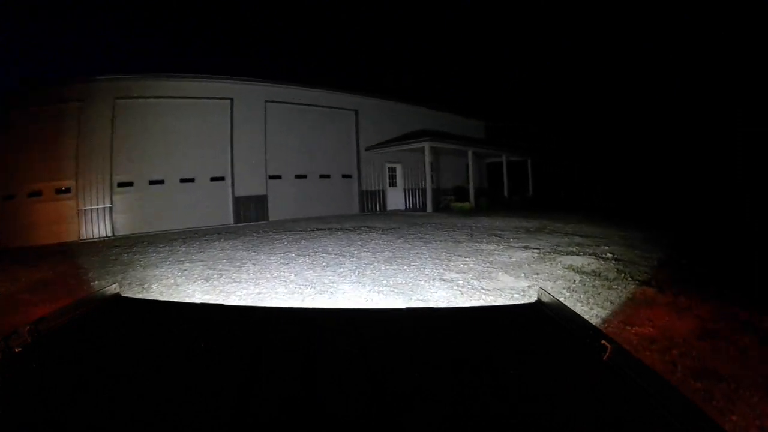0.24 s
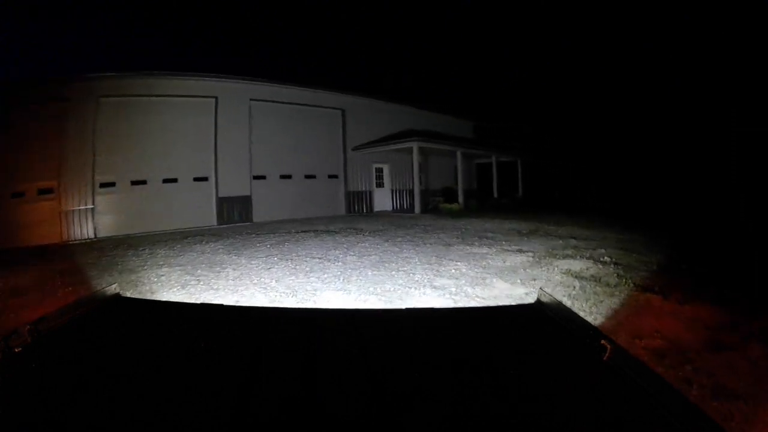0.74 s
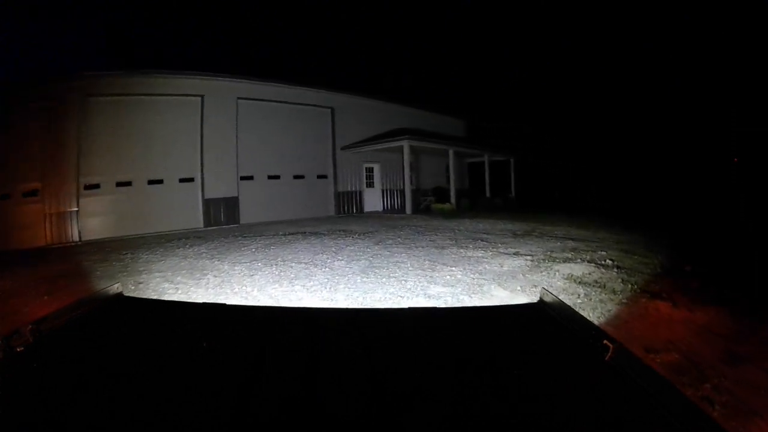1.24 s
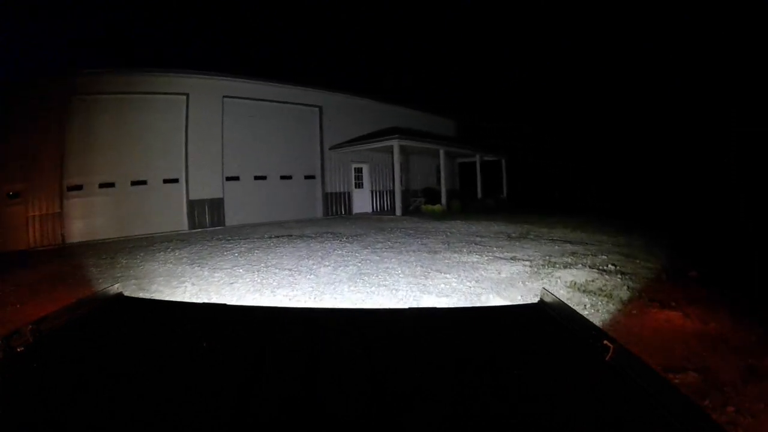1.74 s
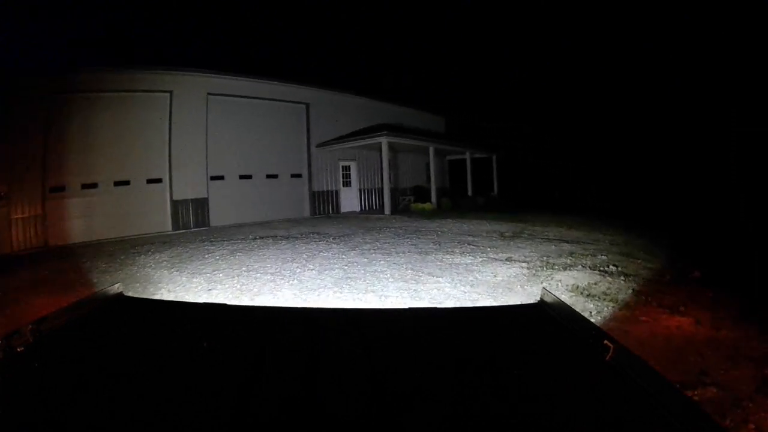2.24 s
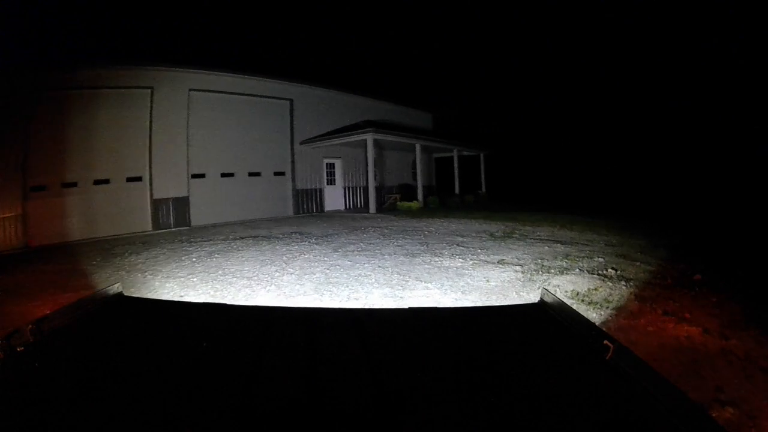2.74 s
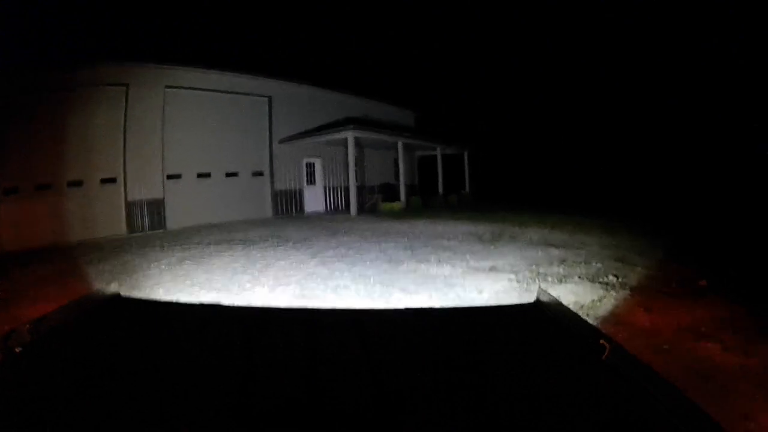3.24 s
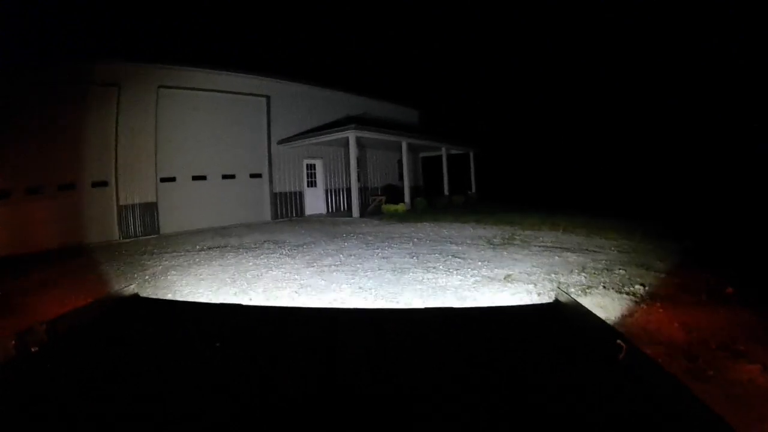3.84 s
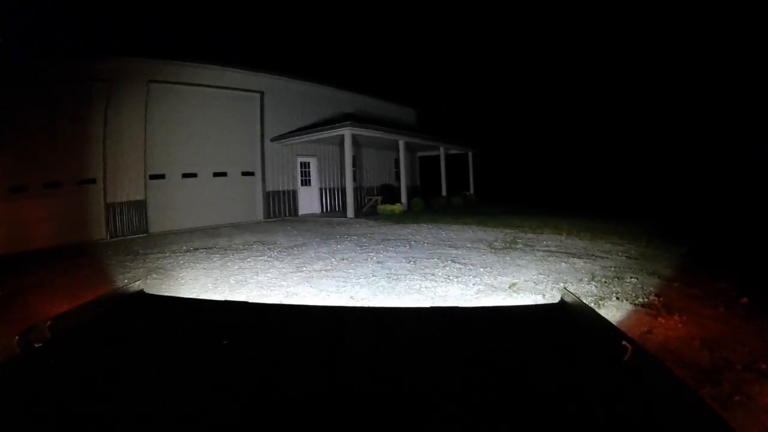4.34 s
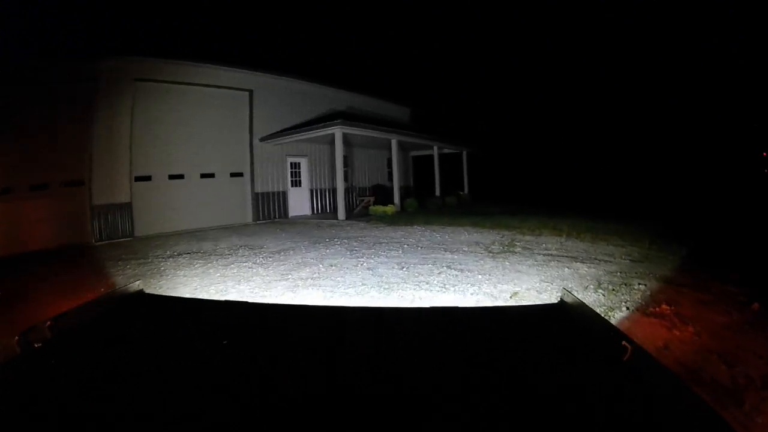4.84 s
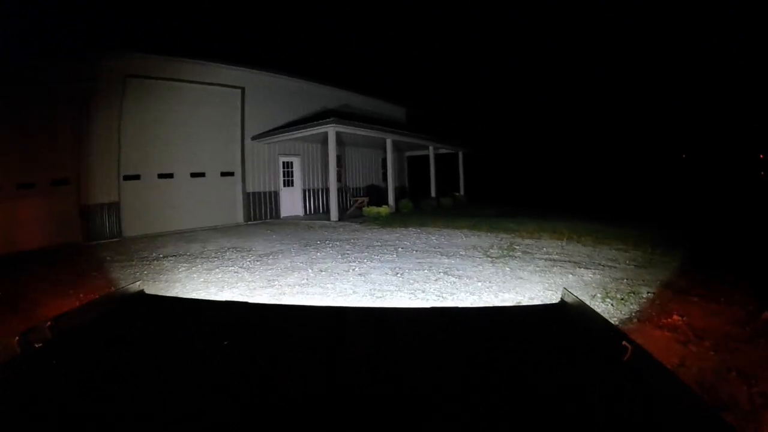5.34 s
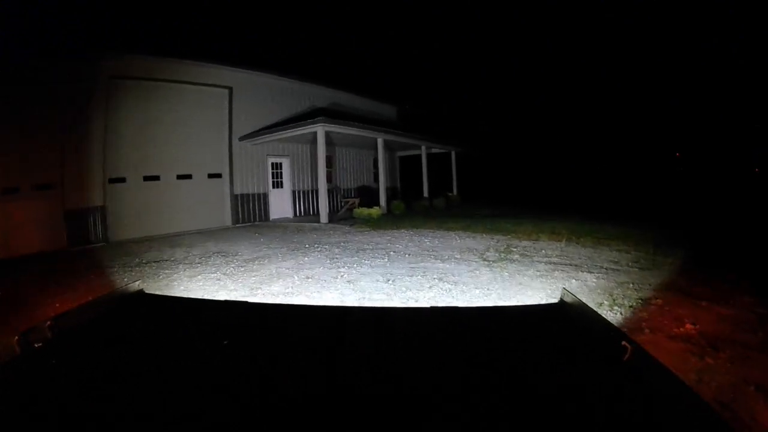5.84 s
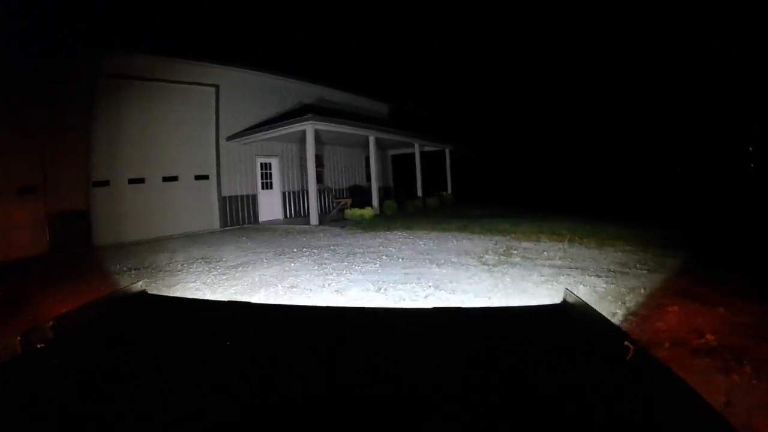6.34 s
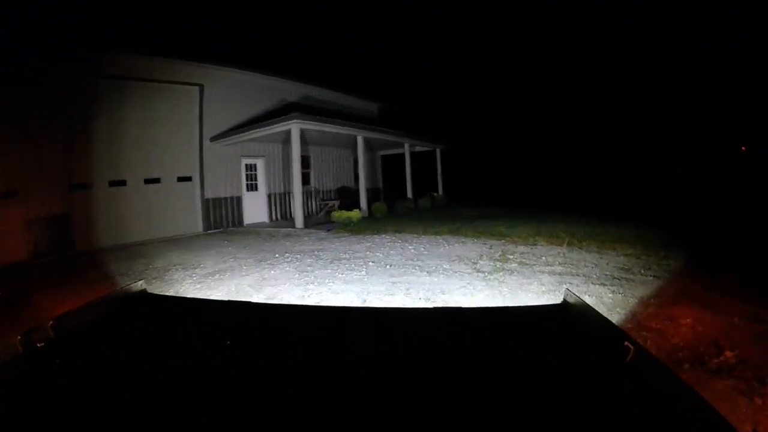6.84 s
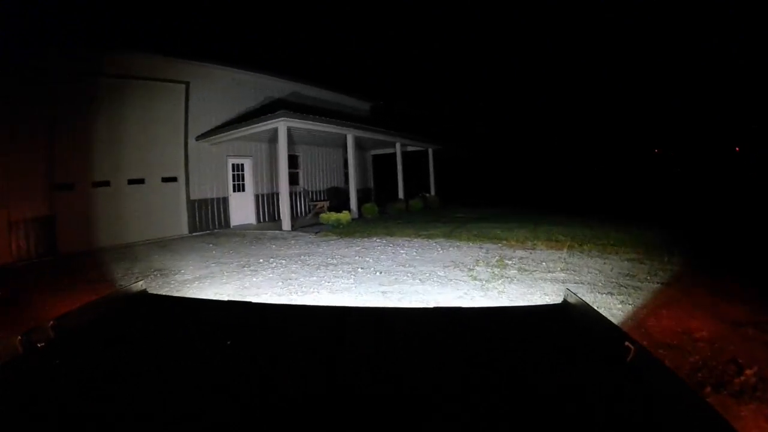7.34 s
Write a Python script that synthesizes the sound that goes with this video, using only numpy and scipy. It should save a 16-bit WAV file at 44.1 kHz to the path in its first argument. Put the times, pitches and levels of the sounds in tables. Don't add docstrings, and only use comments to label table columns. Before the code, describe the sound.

Close hollow rattling and low frame rumble over a gravel yard, swelling to a harsh overloaded battering mid-way, then easing to scattered knocks.

```python
import sys
import numpy as np
from scipy import signal
from scipy.fft import rfft, irfft
from scipy.io import wavfile
from scipy.ndimage import uniform_filter1d

SR = 44100
rng = np.random.default_rng(int(sys.argv[2]) if len(sys.argv) > 2 else 0)


def pcm_store(signal):
    levels = np.round(np.clip(np.atleast_2d(signal), -1, 1) * 32767)
    wavfile.write(sys.argv[1], SR, levels.astype(np.int16).T)


def invert_db(x):
    u = np.asarray(x, float) / 20
    return 10 ** u


N = 335160

# (frequency [Hz], density [dB per Hz])
HISS_SPECTRUM = [(1760, -0.5), (3000, -1.5), (3240, -10), (3460, -6.5), (13100, -11.5), (15900, -7),
                 (16500, -32)]
# (frequency [Hz], density [dB per Hz])
RUMBLE_SPECTRUM = [(15, -19), (28, -2.5), (46, -0.5), (58, -4.5), (73, -2.5), (100, -7.5), (115, -13),
                   (150, -49)]
# (frequency [Hz], density [dB per Hz])
GRAVEL_SPECTRUM = [(200, -16.5), (300, 8), (500, 10.5), (1000, 0), (2000, -4), (2800, -22.5), (4000, -48),
                   (6000, -35)]
# (frequency [Hz], density [dB per Hz])
CRUNCH_SPECTRUM = [(1500, -18), (2100, -1), (2560, 5), (2900, -1), (3400, 4), (4000, -6), (4900, -17),
                   (8000, -48)]
# (time [s], load on the frame [dB], shaking of the mount [dB])
ROLLING = [(0.0, -31.5, -40), (0.74, -28.5, -39.5), (0.89, -29, -34), (1.2, -33, -43), (2.01, -26, -38.5),
           (2.43, -30.5, -45), (2.9, -21.5, -35.5), (3.13, -14, -16.5), (4.04, -24, -21.5),
           (4.42, -33, -46), (4.85, -35.5, -45.5), (5.35, -29.5, -48), (5.59, -26, -40.5),
           (5.99, -31.5, -44.5), (6.5, -22, -34.5), (6.79, -22.5, -31), (6.96, -30.5, -40),
           (7.6, -35.5, -49)]
# (time [s], peak level [dB])
RUT_HITS = [(0.04, -26), (0.483, -35), (0.85, -24), (1.483, -27.5), (1.768, -17.5), (2.941, -15.5),
            (3.133, -20), (3.556, -4.5), (3.947, -12), (5.193, -21.5), (5.416, -20), (6.132, -16.5),
            (6.584, -16.5), (6.739, -40), (7.565, -12), (3.7, -25), (4.955, -22), (6.27, -17),
            (6.37, -16.5), (3.3, -3)]
# (time [s], peak level [dB], frequency [Hz])
FRAME_BUMPS = [(0.088, -25, 51), (0.253, -34, 55), (0.521, -20, 33.6), (0.764, -19, 52), (0.863, -25, 41.8),
               (0.961, -23, 53), (1.103, -29, 38.2), (1.165, -21, 73), (1.556, -25, 75), (1.672, -26, 61),
               (1.918, -24, 70), (1.99, -18.5, 72), (2.08, -13, 50.4), (2.31, -29, 50.5),
               (2.756, -18, 73.4), (2.88, -21, 72), (2.973, -11.5, 60.6), (3.149, -12, 76.5),
               (3.321, -13, 59.4), (3.501, -16, 49.5), (3.666, -9.5, 46.6), (3.808, -11.5, 40),
               (4.062, -20, 78), (4.198, -33, 78), (4.402, -23, 42.7), (4.649, -19.5, 38.3),
               (4.773, -25, 41.7), (4.997, -22, 63.5), (5.32, -18, 80), (5.448, -19, 49.6),
               (5.604, -18, 47.5), (5.723, -23, 49.7), (5.848, -18.5, 77.4), (6.37, -14, 49),
               (6.44, -32, 45), (6.596, -24, 49.7), (6.768, -13, 44.7), (7.007, -25, 69),
               (7.166, -19, 40.7)]
# (time [s], peak level [dB])
FLUNG_STONES = [(0.1157, -35), (0.5523, -26.5), (1.2026, -34), (2.8828, -32), (4.625, -36.5), (5.2, -36),
                (5.319, -28.5), (5.47, -35), (5.991, -28.5), (6.2234, -26), (6.649, -31), (6.831, -36)]
# (time [s], peak level [dB])
CLAMP_TICKS = [(0.717, -40), (1.489, -43), (2.924, -17), (2.9652, -23), (2.993, -36), (3.085, -31),
               (3.124, -33), (3.142, -13), (3.217, -26), (3.281, -21), (3.345, -23.5), (3.4016, -24),
               (3.441, -30), (3.4694, -5), (3.657, -31), (3.702, -20.5), (3.738, -33), (3.955, -31.5)]
# (time [s], peak level [dB])
CLAMP_SLAPS = [(0.8564, -31), (1.8931, -39), (2.1106, -46), (2.9284, -10), (3.0914, -17), (3.153, -10),
               (3.2425, -25), (3.2565, -12), (3.2772, -6), (3.293, -15), (3.3034, -17), (3.304, -7),
               (3.3742, -26), (3.425, -12), (3.4436, -7), (3.475, -16), (3.5678, -34), (3.6446, -27),
               (3.651, -24), (3.6684, -20), (3.8172, -29), (3.8506, -29), (3.932, -29), (4.015, -32),
               (4.0534, -28), (4.0622, -26), (4.118, -37), (4.132, -33), (6.2809, -34), (6.3624, -46)]
# (time [s], length [s], frequency [Hz], level [dB])
METAL_SQUEAK = (3.745, .047, 12150, -60)
# (time [s],
# peak level [dB], frequency [Hz], t60 [s])
SINGLE_MODE_RINGS = [(1.768, -23, 500, 0.038), (2.061, -15.5, 2060, .04), (3.67, -13, 1800, 0.053),
                     (3.738, -2, 2100, 0.015), (4.158, -17, 2060, 0.033), (5.515, -19, 2000, 0.049),
                     (6.318, -25, 696, 0.051), (6.432, -18.5, 2050, 0.043), (6.457, -14, 1280, 0.022),
                     (6.575, -12, 460, 0.028), (6.823, -20, 1970, 0.036), (6.81, -14, 800, 0.053),
                     (0.185, -25, 740, .07), (5.42, -29, 2800, 0.049), (7.424, -22, 598, 0.059),
                     (0.718, -16.5, 233, 0.085), (2.839, -27, 120, 0.11), (3.218, -17, 140, .12),
                     (3.729, -15, 220, .1), (3.87, -15, 224, .1), (5.067, -26, 115, .12), (5.51, -30, 131, .12),
                     (6.133, -18.5, 137, 0.22), (6.575, -17, 125, 0.13), (6.909, -28, 150, .12),
                     (1.276, -32, 3420, .03), (1.4, -33, 2300, .03), (2.72, -24, 3200, 0.047),
                     (7.145, -21, 2550, 0.043), (7.9, -28, 3400, .03), (5.7, -21, 560, 0.1),
                     (7.57, -24.5, 130, .15), (3.7, -13, 160, 0.11), (0.92, -24, 190, .1),
                     (6.35, -27, 130, .12), (6.64, -29, 2900, .02), (6.2, -23, 3300, 0.023),
                     (1.5, -23, 200, .1)]
# (frequency [Hz], t60 [s], level [dB])
LOW_MODES = [(279, 0.04, 3.5), (399, 0.075, -4.5), (534.6, 0.052, 6.5), (580.2, 0.054, 8.5)]
# (frequency [Hz], t60 [s], level [dB])
MAIN_MODES = [(856, 0.083, -3.5), (948.3, 0.033, 9.5), (1016.2, 0.038, 8), (1115.6, 0.017, 6),
              (1350, 0.048, -4.5)]
# (frequency [Hz], t60 [s], level [dB])
UPPER_MODES = [(1664, 0.015, 0.88), (1850, 0.013, 1), (1974, 0.014, -0.45)]
# (frequency [Hz], t60 [s], level [dB])
HIGH_MODES = [(2120, 0.017, 1), (2453, 0.031, -2.5), (2565, 0.025, -3), (3110, 0.017, -6.5),
              (3250, 0.019, -1.5), (3420, 0.019, -2.5), (3590, 0.013, -8.5), (4006, 0.022, -9),
              (4600, 0.02, -17)]
# (time [s], peak level [dB], high modes relative
# [dB], loss per rebound [dB])
HOUSING_JOLTS = [(0.066, -26.5, -25.5, 18), (0.228, -25, -26, -2), (0.295, -29, -24.5, 19.5),
                 (0.424, -17.5, -27, 25), (0.489, -9, -23, 9), (0.716, -1.5, -16.5, 5.5),
                 (0.765, -8.5, -18.5, 14), (0.799, -5.5, -23.5, -3), (0.849, -5.5, -33, 21),
                 (0.855, -3.5, -24.5, 3), (0.902, -10, -32, -3), (0.952, -15.5, -32, 3), (1.013, -19, -24, 4),
                 (1.061, -13.5, -26, 19), (1.144, -17.5, -24.5, 5), (1.178, -19.5, -25, 23),
                 (1.273, -16.5, -25, 21), (1.442, -10.5, -28.5, 3), (1.488, -6.5, -21, 8),
                 (1.577, -18, -30, 4), (1.626, -17.5, -23, 1), (1.664, -17, -19, 12), (1.788, -15, -29, 13),
                 (1.896, -13.5, -21, 6), (1.952, -14.5, -26, 28), (2.007, -15.5, -34, 20),
                 (2.061, -10.5, -18, 1), (2.111, -8.5, -21, 4.5), (2.149, -15.5, -45, 10),
                 (2.211, -14.5, -23.5, 3.5),
                 (2.314, -16, -33, 3), (2.508, -9.5, -24, 33), (2.609, -17.5, -24, 3), (2.658, -17, -43, 7),
               (2.692, -21.5, -22, 19), (2.734, -12.5, -25.5, 22), (2.807, -19, -39, 22),
               (2.871, -11, -24.5, 23), (2.909, -4.5, -36, 7), (2.923, 5, -14, 24),
               (2.963, -5.5, -14.5, 11), (2.993, -2.5, -17, 5), (3.03, -8, -50, 21), (3.044, -9, -25, 61),
               (3.085, 5.5, -17.5, 10.5), (3.141, 4, -14.5, 38), (3.166, -3.5, -36, 48),
               (3.215, -0.5, -13, 27), (3.242, -6.5, -28, 27), (3.258, 5.5, -28, 10), (3.278, 5, -18, 32),
               (3.299, 4.5, -18, 20), (3.326, -2, -17, 15), (3.344, 0, -18, -7), (3.375, -4.5, -32, -39),
               (3.399, 2, -17.5, 3), (3.424, 5, -20, 25), (3.443, 6.5, -26.5, 2), (3.465, 6, -11.5, 39),
               (3.515, -9.5, -11, 5),
                 (3.565, -3.5, -19.5, 3), (3.613, -9, -21, 20), (3.65, -0.5, -15, 19), (3.668, -3, -21, 23),
                 (3.701, -6.5, -14, 19), (3.736, -6.5, -7.5, 28), (3.634, -6.5, -14.5, 10),
                 (3.815, -6.5, -21.5, 21), (3.85, -8, -10, 3), (3.881, -6, -18, 25), (3.594, -17, -9, 20),
                 (3.933, -1.5, -24, 11), (3.956, -5.5, -14.5, 28), (3.99, -11, -17, 8),
                 (4.015, -3.5, -18.5, 18), (4.035, -4, -20.5, 10), (4.059, 1.5, -19, 3),
                 (4.112, -11, -11, 29), (4.131, -2, -22, 3), (4.158, -17, -20, -8), (4.201, -5.5, -23.5, 5),
                 (4.235, -16.5, -23, 21), (4.268, -14, -19.5, 33), (4.305, -22.5, -46, 5),
                 (4.418, -19, -24.5, -3), (4.465, -17, -32, 20), (4.686, -29.5, -36, 20),
                 (5.004, -21.5, -22.5, -3), (5.054, -22.5, -31, 19), (5.132, -17.5, -21.5, 36),
                 (5.31, -28, -21, -4), (5.419, -7.5, -27.5, 11), (5.497, -15, -26, -4),
                (5.528, -11, -26, -7), (5.576, -14.5, -22.5, 5), (5.611, -16.5, -23.5, -3),
                (5.704, -24, -25, 9), (5.773, -17, -21.5, -8), (5.898, -23.5, -25, 10),
                (5.96, -16.5, -26, 14), (6.01, -17, -24, 17), (6.148, -20, -22, -3), (6.187, -16, -19.5, 0),
                (6.28, -8.5, -16.5, -17), (6.302, -8, -33, 17), (6.346, -7, -26, -4),
                (6.361, -6.5, -15.5, 4), (6.395, -8.5, -23.5, 27), (6.431, -18.5, -18, 24),
                (6.505, -13.5, -21, 20), (6.543, -11, -27.5, 19), (6.57, -12.5, -26, 20),
                (6.623, -24, -9, 15), (6.65, -17, -33, 19), (6.806, -12.5, -18, 7), (6.896, -18, -27.5, 5),
                (6.987, -20.5, -38, 2.5), (7.116, -19.5, -26, -3), (7.142, -9, -23.5, 9),
                (7.421, -32.5, -31, 31)]
# (time [s], peak level [dB])
LIGHT_TAPS = [(0.614, -35), (0.823, -14), (0.934, -18), (0.977, -15.5), (1.473, -16.5), (1.511, -14.5),
              (1.536, -17), (1.555, -15), (1.594, -17.5), (1.646, -20), (1.695, -24), (1.858, -19),
              (2.028, -17.5), (2.332, -22), (2.357, -21.5), (2.488, -18), (2.72, -22), (2.945, -8),
              (5.514, -18.5), (5.544, -15.5), (5.652, -25), (5.726, -22), (5.739, -23.5), (5.799, -15),
              (6.102, -22), (6.456, -24), (6.583, -12.5), (6.725, -20.5), (6.767, -15.5), (7.32, -26)]
# (time [s], peak level [dB])
NUDGES = [(0.005, -17.5), (0.023, -37), (0.04, -31), (0.104, -49), (0.131, -25), (0.159, -32),
          (0.185, -18), (0.209, -28), (0.254, -28), (0.312, -32), (0.327, -30), (0.348, -46),
          (0.361, -42), (0.385, -37), (0.55, -22), (0.583, -37), (0.6, -35), (0.647, -48),
          (0.681, -52), (0.739, -1), (0.916, -23), (1.113, -23), (1.227, -27), (1.245, -22),
          (1.311, -24), (1.365, -36), (1.393, -44), (1.417, -27), (1.607, -23), (1.719, -25),
          (1.745, -18), (1.768, -16), (1.816, -17), (1.839, -14), (1.924, -15), (2.069, -15),
          (2.12, -7), (2.196, -12), (2.28, -36), (2.407, -23), (2.469, -22), (2.595, -14.5),
          (2.623, -17), (2.771, -23), (2.844, -21), (2.977, -8), (3.126, 2.5), (3.179, -32),
          (3.527, -10), (3.749, -3), (3.785, -25), (4.318, -18), (4.372, -49), (4.405, -21),
          (4.436, -15),
          (4.521, -22.5), (4.564, -33), (4.605, -23), (4.633, -31), (4.651, -34), (4.735, -21.5),
               (4.766, -31), (4.792, -52), (4.808, -43), (4.833, -44), (4.897, -30), (4.931, -41),
               (4.956, -18), (5.025, -20), (5.204, -37), (5.217, -43), (5.244, -47), (5.293, -32),
               (5.318, -20.5), (5.338, -24), (5.361, -32), (5.39, -25), (5.469, -34), (5.669, -19),
               (5.829, -17), (5.878, -33), (5.942, -23), (5.995, -22), (6.033, -25), (6.081, -25),
               (6.113, -16), (6.13, -18), (6.161, -19), (6.225, -25), (6.317, -13), (6.637, -11),
               (6.699, -11), (6.753, -17), (6.822, -11), (6.869, -41), (7.026, -38), (7.039, -37),
               (7.088, -45), (7.103, -31), (7.186, -18.5), (7.243, -29), (7.271, -34), (7.295, -37),
               (7.347, -38), (7.367, -40), (7.395, -46), (7.502, -42), (7.516, -33), (7.565, -30),
               (7.583, -22)]

KNOCK_LEN = 4096


def colour(x, spectrum):
    hz, db = np.transpose(spectrum)
    f = np.maximum(np.arange(N // 2 + 1) * SR / N, 1)
    gain_db = np.interp(np.log(f), np.log(hz), db, left=-90, right=-90)
    y = irfft(rfft(x) * invert_db(gain_db), N)
    return y / np.std(y)


def walk(rate):
    hold = int(SR / rate)
    levels = np.repeat(rng.standard_normal(N // hold + 1), hold)
    return 3.03 * uniform_filter1d(uniform_filter1d(levels, hold), hold)[:N]


def peak_one(y):
    return y / np.abs(y).max(axis=1, keepdims=True)


def place(s, sound):
    out = np.zeros(N + SR)
    for start, row in zip((s[:, 0] * SR).astype(int), sound):
        out[start:start + len(row)] += row
    return out[:N]


def band(x, lo_hz, hi_hz):
    return signal.sosfilt(signal.butter(2, [lo_hz, hi_hz], "band", fs=SR, output="sos"), x)


def lowpass(x, order, hz):
    return signal.sosfilt(signal.butter(order, hz, fs=SR, output="sos"), x)


def chatter(count, rise_s, fade_s, spiky):
    t = np.arange(KNOCK_LEN // 2) / SR
    chance = rng.standard_normal((count, len(t) + 1))
    contacts = chance[:, 1:] * np.abs(chance[:, 1:]) ** spiky
    fade = np.exp(-t / (fade_s * invert_db(2 * chance[:, :1])))
    return contacts * (1 - np.exp(-t / rise_s)) * fade


def preamp_noise():
    whine_hz, width_hz = 12820, 300
    whine = [(whine_hz - width_hz, -25), (whine_hz, 0), (whine_hz + width_hz, -25)]
    hiss = invert_db(-60.5) * colour(rng.standard_normal(N), HISS_SPECTRUM)
    return hiss + invert_db(-79) * colour(rng.standard_normal(N), whine)


def frame(load_db, shake_db):
    rumble = colour(rng.standard_normal(N), RUMBLE_SPECTRUM) * invert_db(load_db - 1.5 + walk(15.0))
    drone_spectrum = [(100, -0.5), (130, 2.0), (155, -4.0), (200, -1.5), (330, -8.5), (420, -12)]
    drone = colour(rng.standard_normal(N), drone_spectrum)
    drone_db = 0.64 * load_db + 0.35 * shake_db + 1.44
    s, db = np.transpose(RUT_HITS)[:, :, None]
    t = np.arange(SR // 2) / SR
    rise_s, fade_s = 0.0023, 0.12
    ruts = place(s, invert_db(db - 12.5) * (1 - np.exp(-t / rise_s)) * np.exp(-t / fade_s))
    return rumble + drone * np.hypot(invert_db(drone_db - 8.5), ruts) * invert_db(1.01 * walk(25))


def bumps():
    s, db, hz = np.transpose(FRAME_BUMPS)[:, :, None]
    t = np.arange(-SR // 12, SR // 12) / SR
    swell = np.exp(-(t / 0.02) ** 2 / 2)
    return place(s + t[0], invert_db(db - 3) * swell * np.sin(2 * np.pi * hz * t))


def gravel():
    grains = (rng.random(N) < 1600 / SR) * rng.standard_normal(N)
    return colour(grains * invert_db(1.45 * walk(22)), GRAVEL_SPECTRUM)


def flung_stones():
    s, db = np.transpose(FLUNG_STONES)[:, :, None]
    puffs = chatter(count=len(s), rise_s=0.0027, fade_s=0.016, spiky=0.2)
    return place(s, invert_db(db - 5.0) * peak_one(band(puffs, 1100, 3170)))


def squeak():
    start_s, length_s, hz, db = METAL_SQUEAK
    t = np.arange(N) / SR - start_s
    envelope = np.clip(np.minimum(t, length_s - t) / 0.004, 0, 1)
    return invert_db(db) * envelope * np.sin(2 * np.pi * hz * t)


def ticks():
    s, db = np.transpose(CLAMP_TICKS)[:, :, None]
    clicks = chatter(count=len(s), rise_s=0.00024, fade_s=0.001, spiky=0.45)
    return place(s, invert_db(db + 8.0) * peak_one(band(clicks, 4200, 18000)))


def slaps():
    s, db = np.transpose(CLAMP_SLAPS)[:, :, None]
    cracks = chatter(count=len(s), rise_s=0.00037, fade_s=0.0032, spiky=0.44)
    return place(s, invert_db(db - 8.0) * peak_one(band(cracks, 2900, 10600)))


def crunch(knocks):
    pole = np.exp(-1 / SR / 0.0014)
    force = signal.lfilter([1 - pole], [1, -pole], np.abs(knocks))
    crack_db = 2.5 * rng.exponential(size=N) + 0.63 * walk(37)
    cracks = (rng.random(N) < 900 / SR) * invert_db(crack_db)
    tail = rng.standard_normal(400) * np.exp(-np.arange(400) / SR / 0.00062)
    grit = colour(signal.fftconvolve(cracks, tail)[:N], CRUNCH_SPECTRUM)
    return invert_db(-17.5) * force ** 1.465 * grit


def rings():
    s, db, hz, t60 = np.transpose(SINGLE_MODE_RINGS)[:, :, None]
    t = np.arange(KNOCK_LEN) / SR
    envelope = (1 - np.exp(-t / 0.00059)) * np.exp(-np.log(1000) * t / t60)
    return place(s, invert_db(db) * envelope * np.sin(2 * np.pi * hz * t))


def ring(modes, count, scatter_db, detune):
    t, out = np.arange(KNOCK_LEN // 2) / SR, 0
    for hz, t60, db in modes:
        chance = rng.standard_normal((count, 2))
        size = invert_db(db + scatter_db * chance[:, :1])
        tone = np.sin(2 * np.pi * hz * (1 + detune * chance[:, 1:]) * t)
        out = out + size * np.exp(-np.log(1000) * t / t60) * tone
    return out


def jiggle():
    unrest = invert_db(3.5 * walk(55))
    contacts = (rng.random(N) < 1200 / SR) * rng.standard_normal(N) * unrest
    body = 0
    for modes, db in ((LOW_MODES, -4), (MAIN_MODES, 0), (UPPER_MODES, -12), (HIGH_MODES, -14)):
        body = body + invert_db(db) * ring(modes, count=1, scatter_db=1.5, detune=0)[0]
    y = signal.fftconvolve(contacts, body)[:N]
    return y / np.std(y)


def struck(blow, modes, detune, swell_s):
    decay = ring(modes, count=len(blow), scatter_db=2.5, detune=detune)
    decay = decay * (1 - np.exp(-np.arange(KNOCK_LEN // 2) / SR / swell_s))
    return peak_one(irfft(rfft(blow, KNOCK_LEN) * rfft(decay, KNOCK_LEN), KNOCK_LEN))


def blows():
    taps = [(tap_s, db, -26.5, 14) for tap_s, db in LIGHT_TAPS]
    nudge_s, nudge_db = np.array(NUDGES).T
    nudge_s = nudge_s + 0.00091 * rng.random(len(nudge_s))
    chance = rng.standard_normal((len(nudge_s), 2))
    nudges = np.transpose([nudge_s, nudge_db - 6.5, -29 + 3 * chance[:, 1], 16 + 2 * chance[:, 0]])
    return np.vstack([HOUSING_JOLTS, taps, nudges])


def housing():
    s, peak_db, high_db, loss_db = blows().T[:, :, None]
    low_db = -6.5 + 3.5 * rng.standard_normal(s.shape)
    blow = chatter(count=len(s), rise_s=0.00068, fade_s=0.0016, spiky=0.25)
    scrape = blow + 0.76 * chatter(count=len(s), rise_s=0.00053, fade_s=0.0052, spiky=0.32)
    push = lowpass(blow, 2, 1760)
    panels = struck(push, MAIN_MODES, detune=0.018, swell_s=0.0023)
    panels = panels + invert_db(low_db + 0.5) * struck(push, LOW_MODES, detune=0.024, swell_s=0.0042)
    upper = struck(scrape, UPPER_MODES, detune=0.029, swell_s=0.00074)
    high = struck(scrape, HIGH_MODES, detune=0.013, swell_s=0.0011)
    upper_gain = invert_db(1.02 * high_db + 0.13 * peak_db + 13.0)
    high_gain = invert_db(high_db + 7.0)

    def spot(k):
        bright = upper_gain * np.roll(upper, k, axis=0) + high_gain * np.roll(high, k, axis=0)
        return np.roll(panels, k, axis=0) + bright

    out = place(s, invert_db(peak_db - 0.5) * spot(0))
    for bounce in (1, 2):
        s = s + 0.02 * (1 + 0.14 * rng.standard_normal(s.shape))
        rebound_db = peak_db - 8.5 - bounce * np.maximum(loss_db, 0)
        out += place(s, invert_db(rebound_db) * spot(bounce))
    return signal.sosfilt(signal.butter(2, 206, "high", fs=SR, output="sos"), out)


def scene():
    s, load, shake = np.transpose(ROLLING)
    t = np.arange(N) / SR
    load_db, shake_db = np.interp(t, s, load), np.interp(t, s, shake)
    below = frame(load_db, shake_db) + bumps() + invert_db(0.68 * shake_db - 12.0) * gravel() + flung_stones()
    borne = housing() + rings() + invert_db(shake_db - 0.5) * jiggle()
    borne = lowpass(borne, 4, 3780)
    clamp = squeak() + ticks() + slaps() + crunch(borne)
    return (below + clamp + borne)[None]


def top_cut(x):
    return signal.sosfilt(signal.butter(12, 16810, fs=SR, output="sos"), x)


def record(dry):
    down, up, rail = 441, 320, 0.69
    converted = signal.resample_poly(dry + preamp_noise(), up, down, axis=1)
    clipped = np.clip(converted, -rail, rail)
    padded = np.pad(clipped, ((0, 0), (up, up)), "linear_ramp")
    mix = signal.resample(padded, N + 2 * down, axis=1)[:, down:-down]
    return top_cut(mix)


dry = scene()
out = record(dry)
pcm_store(out)
```